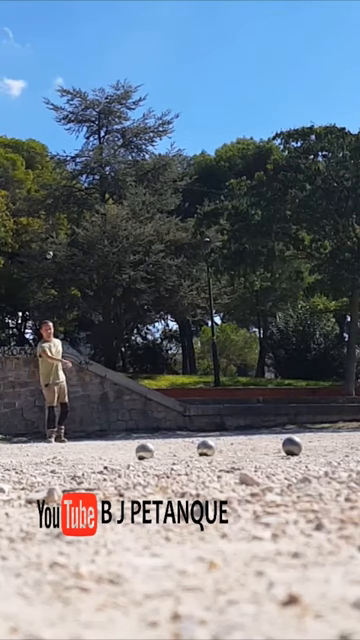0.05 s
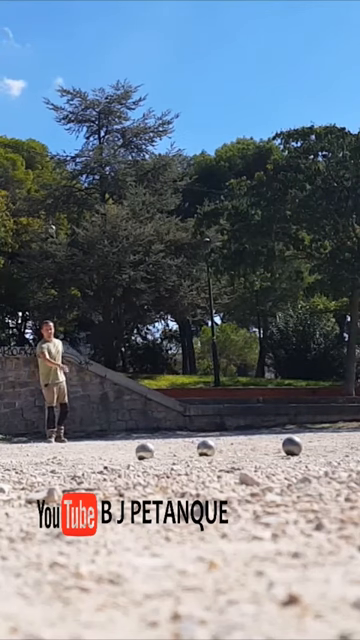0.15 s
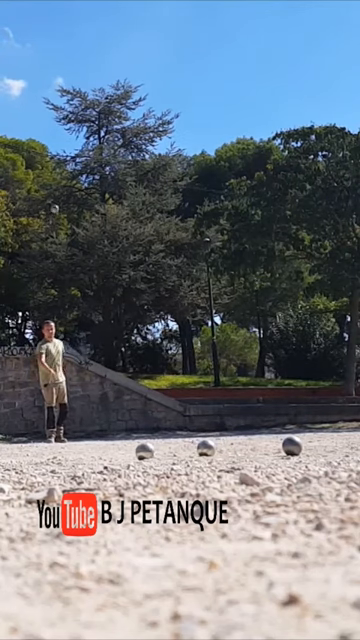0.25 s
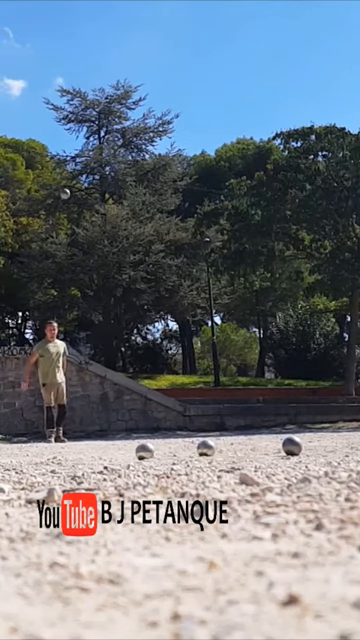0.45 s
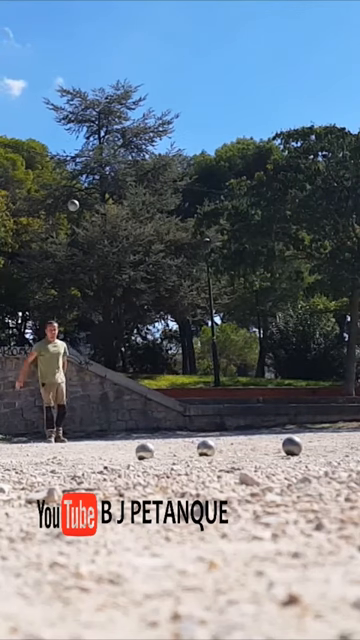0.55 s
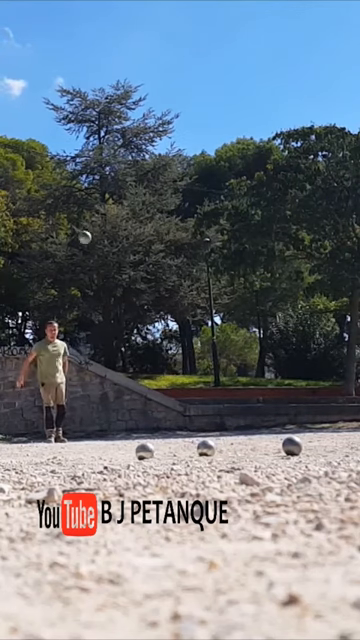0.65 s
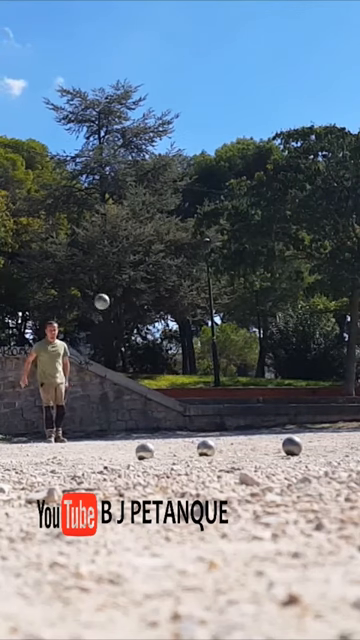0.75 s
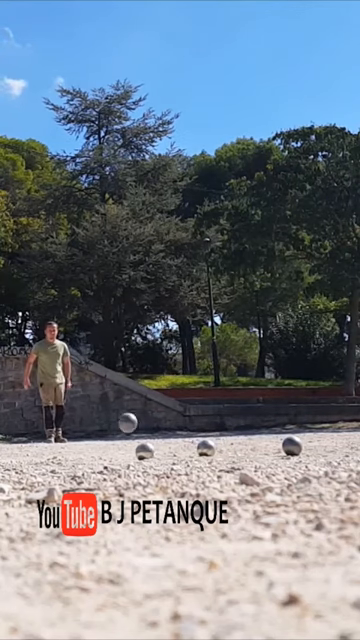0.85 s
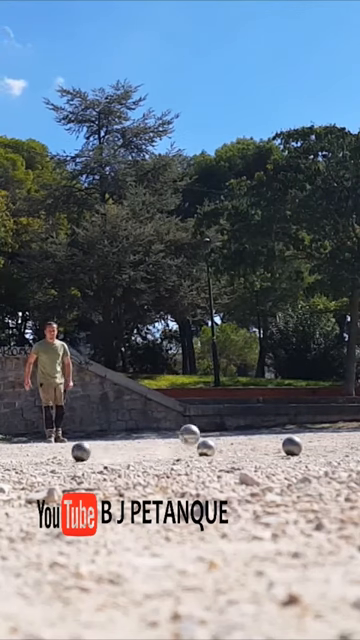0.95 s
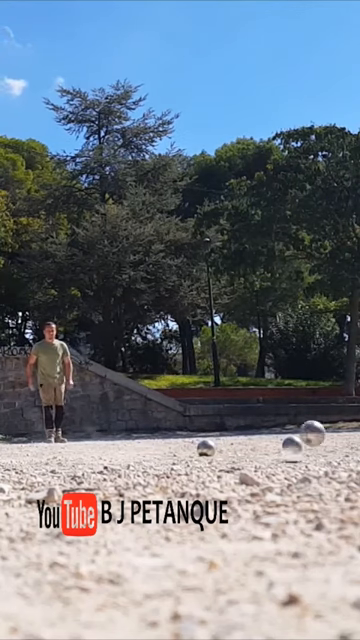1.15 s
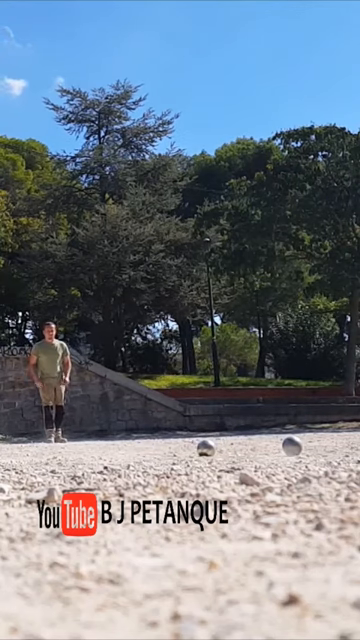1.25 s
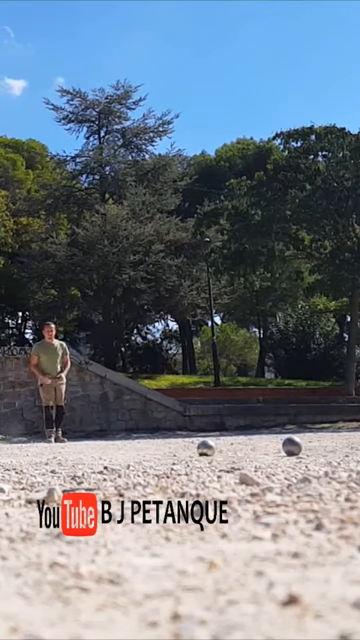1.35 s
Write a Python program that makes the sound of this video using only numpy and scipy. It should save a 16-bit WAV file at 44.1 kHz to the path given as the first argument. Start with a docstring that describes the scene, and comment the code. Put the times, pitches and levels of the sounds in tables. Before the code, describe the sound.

A hard, dry crack of two steel balls at about 1.06 seconds, overloaded and stronger on the right, with a bright tick, faint high ring and short outdoor echo. Before it, low wind buffets, a thin insect buzz until 0.4, bird whistles from 0.35 to 0.97 and faint distant knocks. Afterwards, dull ground thuds and weakening gravel bounces until 1.3, as the background sinks away.

```python
"""A thin insect buzz and wind come first; the wind buffets mainly the right port of a microphone on the ground,
and a bird whistles in the trees. A thrown steel boule then hits another on gravel: one overloading crack with
a bright tick, a faint high ring, thuds into the ground and gritty bounces, while the background sinks away.
Hard sounds are sine waves that die away; wind, gravel, echoes, insect and faint knocks are shaped noise;
the bird is a sine wave that follows drawn pitch curves."""
import sys
import numpy as np
from scipy import signal
from scipy.fft import rfft, irfft, next_fast_len
from scipy.io import wavfile
from scipy.ndimage import uniform_filter1d, map_coordinates

SR = 44100
rng = np.random.default_rng(int(sys.argv[2]) if len(sys.argv) > 2 else 0)


def transcribe(signal):
    """Save signal, clipped to [-1, 1], as a 16-bit WAV file at the path in sys.argv[1]."""
    frames = np.atleast_2d(signal).T
    limited = np.clip(frames, -1, 1)
    pcm = np.round(limited * 32767).astype(np.int16)
    wavfile.write(sys.argv[1], SR, pcm)


N = 61739  # samples, 1.4 s
HIT_S = 1.05906  # the moment the boules meet


def amp(db):
    """Decibels to a plain multiplier."""
    return 10 ** (np.asarray(db) / 20)


def unit(x):
    """x scaled to an average strength (rms) of 1."""
    return x / np.sqrt(np.mean(x ** 2) + 1e-20)


def clock():
    """The time of every sample, in seconds."""
    return np.arange(N) / SR


def placed(x, left_db):
    """Stereo, with the left side left_db louder (or softer, if negative)."""
    return x * np.array([[amp(left_db)], [1]])


def filtered(x, response):
    """x with each frequency multiplied by response(f/Hz)."""
    m = next_fast_len(N + SR // 2)  # spare room, so that filter tails do not wrap round
    spectrum = rfft(x, m) * response(np.fft.rfftfreq(m, 1 / SR))
    return irfft(spectrum, m)[..., :N]


def coloured(x, points):
    """x shaped by a table of f/Hz, level/dB, at rms 1."""
    f, db = np.transpose(points)
    return unit(filtered(x, lambda hz: amp(np.interp(np.log(hz + 1), np.log(f), db))))


def noise(points, channels=1):
    """Coloured noise, unrelated between channels."""
    return coloured(rng.standard_normal((channels, N)), points)


def wobble(rate):
    """A smooth random curve through `rate` random points a second."""
    return map_coordinates(rng.standard_normal(N), [clock() * rate + 4])


def fade(start, t60, attack):
    """A quick rise, then a steady decay that loses 60 dB every t60 seconds."""
    t = np.maximum(clock() - start, 0)
    return amp(-60 * t / t60) * (1 - np.exp(-t / attack))


def ring(start, hz, t60, attack):
    """One damped mode: a sine wave that dies away."""
    return fade(start, t60, attack) * np.sin(2 * np.pi * hz * (clock() - start))


# the crack's heavily damped swings: f/Hz, level/dB, t60/s
CRACK_SWINGS = [(2541, 16.5, 0.0037), (1443, 22.5, 0.0023), (3000, 13.5, 0.0036), (2035, 29, 0.0024),
                (4110, -7, .005), (840, -12, 0.0074)]
CRACK_ATTACK_S = 0.0012
LEFT_LAG_S, LEFT_DULL_HZ = 0.00008, 2000


def crack():
    """The two balls jolt the air for a few cycles; the left port hears it later and duller."""
    def swing(start):
        return sum(amp(db) * ring(start, hz, t60, CRACK_ATTACK_S) for hz, db, t60 in CRACK_SWINGS)

    left = filtered(swing(HIT_S + LEFT_LAG_S), lambda hz: 1 / np.sqrt(1 + (hz / LEFT_DULL_HZ) ** 2))
    right = swing(HIT_S)
    return placed(np.array([left, right]), left_db=-8.5)


# a very brief bright tick at the hit (the 13400 Hz row), and faint high ringing of the steel (all other rows):
# f/Hz, level/dB before the flutter, t60/s
TICK_AND_STEEL = [(9820, -74.5, .25), (10250, -75.5, 0.2), (10610, -77.5, .2), (12807, -62.5, 0.41),
                  (12885, -67.5, .33), (13400, -23, 0.0038), (14030, -63, .48), (14287, -57.5, .3),
                  (14060, -55.5, .2), (14480, -61.5, 0.29), (14648, -59.5, .28), (15208, -69.5, .35)]
WAVER_RAD, FLUTTER_DB = 0.66, 9.5


def tick_and_steel():
    """A very brief bright tick at the hit, and faint high ringing of the steel: wavering, fluttering sines."""
    out = np.zeros(N)
    for hz, db, t60 in TICK_AND_STEEL:
        level = amp(db + FLUTTER_DB * wobble(50))
        phase = 2 * np.pi * hz * clock() + WAVER_RAD * wobble(210)
        out += level * fade(HIT_S, t60, attack=0.0005) * np.sin(phase)
    return placed(out, left_db=-13)


# the crack scattered by the pitch, then by walls and trees: level/dB, t60/s, left minus right level/dB
SCATTER_TAILS = [(-23.5, 0.1, -15), (-53.5, 0.62, 3.5)]
# tone of the scattered sound: f/Hz, level/dB
SCATTER_TONE = [(100, 4), (400, 2), (800, 1.5), (1500, 3), (2200, 0.5), (3100, -9), (4200, -25),
                (6000, -40.5), (9000, -50), (16000, -52)]


def scatter():
    """The surroundings return the crack as a short and a long diffuse tail, made of fading noise."""
    out = np.zeros((2, N))
    for db, t60, left_db in SCATTER_TAILS:
        shared = noise(SCATTER_TONE)  # the same at both ports
        separate = noise(SCATTER_TONE, channels=2)
        tail = unit(shared + 0.78 * separate) * amp(db) * fade(HIT_S, t60, attack=0.00033)
        out += placed(tail, left_db)
    return out


# boules driven into the ground: t/s, level/dB
THUD_TIMES = [(1.0597, -12), (1.0738, -10)]
# damped modes of the packed ground: f/Hz, level/dB within a thud, t60/s
GROUND_MODES = [(422, 3.5, 0.0089), (246, -7.5, 0.023), (127, -26.5, 0.02), (950, -13, 0.0011)]


def thuds():
    """Each boule gives the packed ground a dull push, and the ground quickly damps it."""
    out = np.zeros((2, N))
    for s, db in THUD_TIMES:
        thud = sum(amp(db + mode_db) * ring(s, hz, t60, attack=0.0009) for hz, mode_db, t60 in GROUND_MODES)
        out -= placed(thud, left_db=-3.0)  # minus: the push has the opposite sign
    return out


# gravel struck by the boules: t/s, level/dB of the whole strike, t60/s of the crunch,
# left minus right level/dB, pebble pitch f/Hz
GRAVEL_STRIKES = [(1.0596, -17, .008, -4, 2100), (1.0739, -25, .007, -6, 1900),
                  (1.0945, -33, .006, -5, 1100), (1.1006, -31.5, .006, -6, 2100),
                  (1.1093, -31, .009, -7, 2000), (1.1372, -31.5, .009, 0, 1400),
                  (1.1398, -34.5, .009, 0, 1900), (1.1645, -48, .015, -4, 1600),
                  (1.1888, -40.5, .006, -4, 1600), (1.2725, -53, .03, -3, 1300),
                  (1.2797, -43, .016, -4, 1400), (1.2825, -43, .012, -5, 950)]
# tone of the crunch: f/Hz, level/dB
GRAVEL_TONE = [(100, -6), (450, 6), (1000, 3), (2200, -4.5), (3100, -13), (4400, -9.5), (5400, -22.5),
               (10000, -37), (16000, -56)]
CRUNCH_ATTACK_S, GRAIN_SPREAD_DB = 0.000057, 2
GRAIN_REACH = 2.2  # the crunch reaches up to this many times the pebble's pitch
PEBBLE_DB, CRUNCH_DB = 7, -2.5  # both on top of the strike's level
PEBBLE_T60_S = 0.0035


def gravel():
    """Pebbles click (a damped sine) and crunch (grainy noise) under the balls, the lower-pitched ones duller."""
    out = np.zeros((2, N))
    for s, db, t60, left_db, pitch in GRAVEL_STRIKES:
        rough = rng.standard_normal(N) * amp(GRAIN_SPREAD_DB * wobble(1700))
        grains = coloured(rough, GRAVEL_TONE) * fade(s, t60, CRUNCH_ATTACK_S)
        crunch = filtered(grains, lambda hz: 1 / np.sqrt(1 + (hz / (GRAIN_REACH * pitch)) ** 10))
        click = amp(PEBBLE_DB) * ring(s, pitch, PEBBLE_T60_S, attack=0.00025)
        out += placed(amp(db) * (click + amp(CRUNCH_DB) * crunch), left_db)
    return out


# eddies at the right port: middle t/s, level/dB, spread either side t/s, level/dB of the rip against the swirl
EDDY_TIMES = [(0.223, -35, 0.02, -9.5), (0.257, -23.5, 0.0078, -12.5), (0.303, -21.5, 0.0077, -12.5),
              (0.45, -19, 0.0048, -21.5), (0.493, -20.5, 0.0091, -10), (0.54, -25, 0.015, -25),
              (0.579, -30.5, 0.0038, 1.5), (0.595, -21.5, 0.012, -18.5), (0.658, -25.5, 0.0096, -41),
              (0.7, -34.5, 0.024, -19.5), (0.756, -31.5, 0.0044, -16), (0.894, -24, 0.014, -8.5),
              (0.937, -14, 0.0089, -24.5), (0.961, -23.5, 0.014, -7.5), (1.013, -25.5, 0.019, -29)]
# tone of the low swirl: f/Hz, level/dB
SWIRL_TONE = [(20, -9), (45, -11.5), (75, 7), (160, -0.5), (250, -13), (400, -28), (800, -43.5),
              (2000, -62), (6000, -92)]
# tone of the higher rip: f/Hz, level/dB
RIP_TONE = [(100, -11), (250, 9), (400, -7.5), (700, -15), (1500, -38), (4000, -74)]


def eddies():
    """Short low swirls of wind, mainly on the right port, each mixed with a share of higher rip."""
    def even(x):
        """Level out the noise's own swells."""
        return x / np.sqrt(np.abs(uniform_filter1d(x ** 2, size=1300)) + 0.05)

    swirl = even(noise(SWIRL_TONE, channels=2))
    rip = even(noise(RIP_TONE, channels=2))
    out = np.zeros((2, N))
    for middle, db, spread, rip_db in EDDY_TIMES:
        swell = np.exp(-0.5 * ((clock() - middle) / spread) ** 2)
        out += amp(db) * swell * (swirl + amp(rip_db) * rip)
    return placed(out, left_db=-32.5)


# bird notes, each a curve: t/s, f/Hz, level/dB, waver as a share of the pitch
BIRD_NOTES = [
    [(.345, 2850, -69, .04), (.38, 3080, -55, .03), (.395, 3280, -60, .04), (.415, 3350, -57, .04),
     (.43, 3740, -54, .012), (.465, 3720, -56, .02), (.5, 3550, -59, .035), (.58, 3520, -64, .04),
     (.65, 3500, -69, .04)],
    [(.658, 2500, -63, .02), (.678, 2900, -56, .02), (.686, 2980, -60, .02)],
    [(.678, 4300, -61, .06), (.692, 4050, -58, .05), (.7, 3960, -53, .007), (.719, 3950, -51, .007),
     (.727, 4200, -50, .015), (.738, 4130, -53, .015), (.748, 4360, -49, .012), (.795, 4190, -51, .01),
     (.825, 4150, -66, .03), (.865, 4210, -53, .008), (.91, 4180, -66, .02)],
    [(.925, 4700, -70, .01), (.955, 4650, -64, .01), (.975, 4600, -70, .01)],
]
BIRD_WAVER_RATE = 650  # random points a second
BIRD_ECHO_DB, TREES_T60_S = -6, 0.8


def bird():
    """Wavering whistles, each a sine wave along a pitch curve, that linger among the trees."""
    t = clock()
    song = np.zeros(N)
    for note in BIRD_NOTES:
        s, hz, db, waver = np.transpose(note)
        pitch = np.interp(t, s, hz) * (1 + np.interp(t, s, waver) * wobble(BIRD_WAVER_RATE))
        gate = np.clip(np.minimum(t - s[0], s[-1] - t) / 0.0058, 0, 1)  # soft start and end
        level = amp(np.interp(t, s, db) + 1.2 * wobble(90))
        song += gate * level * np.sin(2 * np.pi * np.cumsum(pitch) / SR)
    tail = rng.standard_normal((2, N)) * fade(0, TREES_T60_S, attack=0.013)
    echo = signal.fftconvolve(song[None], tail / np.linalg.norm(tail[0]), axes=1)[:, :N]
    return placed(song + amp(BIRD_ECHO_DB) * echo, left_db=-23.5)


# thin insect buzzes: middle t/s, half length t/s, f/Hz, half width f/Hz, level/dB
INSECT_BUZZES = [(0.098, 0.13, 12550, 129, -59), (0.23, 0.22, 8280, 129, -80)]


def insect():
    """Narrow bands of very high noise that swell and fade."""
    out = np.zeros(N)
    for s, half, hz, width, db in INSECT_BUZZES:
        band = unit(filtered(rng.standard_normal(N), lambda f: 1 / (1 + ((f - hz) / width) ** 2)))
        out += band * amp(db) * np.exp(-((clock() - s) / half) ** 2)
    return placed(out, left_db=-18)


# faint distant knocks: t/s, level/dB
KNOCK_TIMES = [(0.445, -38), (0.623, -41.5), (0.74, -39)]
KNOCK_HZ, KNOCK_WIDTH_HZ, KNOCK_T60_S = 964, 200, 0.053


def knocks():
    """Soft, dull knocks somewhere far off: bursts of noise around one pitch."""
    out = np.zeros(N)
    for s, db in KNOCK_TIMES:
        band = filtered(rng.standard_normal(N), lambda hz: 1 / (1 + ((hz - KNOCK_HZ) / KNOCK_WIDTH_HZ) ** 2))
        out += amp(db) * unit(band) * fade(s, KNOCK_T60_S, attack=0.0039)
    return placed(out, left_db=-11.5)


# changing level of the background: t/s, rumble level/dB, air level/dB
BACKGROUND_LEVEL = [(0, -3, 4), (.45, -5.5, 5), (.85, -3, 5), (1.041, -7, 5.5), (1.12, -24, 7.5),
                    (1.22, -32, -3.5), (1.311, -32, -11), (1.4, -24.5, -24)]
# tone of the low rumble: f/Hz, level/dB
RUMBLE_TONE = [(20, -17.5), (45, 0), (80, 3.5), (160, -2.5), (300, -15), (600, -24), (2000, -76)]
# tone of the rush of air: f/Hz, level/dB
AIR_TONE = [(100, 6.5), (400, 5), (1000, 1.5), (2000, -10), (3200, -19.5), (5000, -25), (8000, -30.5),
            (10000, -40.5), (13500, -20.5), (15000, -33), (16000, -46)]
# tone of the steady hush of the open air: f/Hz, level/dB
FLOOR_TONE = [(20, -19.5), (40, -2), (100, 1), (380, -17), (550, -11.5), (800, -12.5), (1100, -31),
              (2000, -35), (8000, -53.5)]
# left and right, before the changing level is added
RUMBLE_DB, AIR_DB = [[-38.5], [-30.5]], [[-58.5], [-53.5]]
FLOOR_DB = -60


def wind():
    """Low rumble and a rush of air at both ports, as noise that wobbles in level, over a steady floor."""
    t = clock()
    s, rumble_db, air_db = np.transpose(BACKGROUND_LEVEL)
    rumble_level = np.array(RUMBLE_DB) + np.interp(t, s, rumble_db) + 0.81 * wobble(30)
    air_level = np.array(AIR_DB) + np.interp(t, s, air_db) + 0.53 * wobble(37)
    rumble = noise(RUMBLE_TONE, channels=2) * amp(rumble_level)
    air = noise(AIR_TONE, channels=2) * amp(air_level)
    hush = amp(FLOOR_DB) * noise(FLOOR_TONE, channels=2)
    return rumble + air + hush


def scene():
    """All the sounds together, from the hit to the background."""
    hit = crack() + tick_and_steel() + scatter() + thuds() + gravel()
    background = eddies() + bird() + insect() + knocks() + wind()
    return hit + background


# treble shaping after the overload, a bright edge near 10 kHz and duller above: f/Hz, level/dB
TREBLE_SHAPE = [(8600, 0.5), (10300, 5), (11200, -3), (12400, -8), (14800, -2.5), (16500, -9)]
CLIP_TOP, CLIP_HARDNESS = np.array([[0.7], [0.86]]), 8  # ceilings: left, right
TOP_HZ = 16700


def record(dry):
    """The crack overloads the recorder; then the treble is shaped and cut steeply above a band limit."""
    clipped = dry / (1 + np.abs(dry / CLIP_TOP) ** CLIP_HARDNESS) ** (1 / CLIP_HARDNESS)
    shaped = filtered(clipped, lambda hz: amp(np.interp(hz, *np.transpose(TREBLE_SHAPE))))
    return filtered(shaped, lambda hz: 1 / np.sqrt(1 + (hz / TOP_HZ) ** 120))


dry = scene()
out = record(dry)
transcribe(out)
```